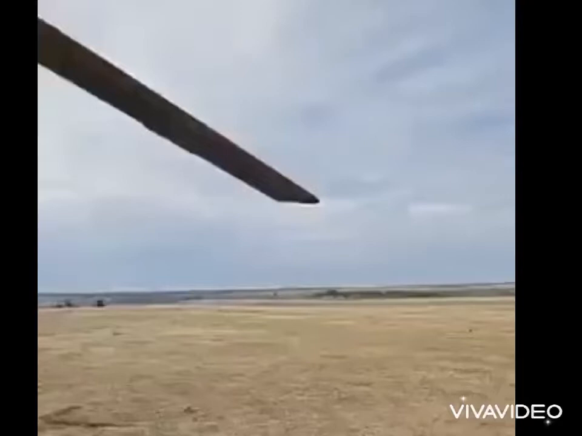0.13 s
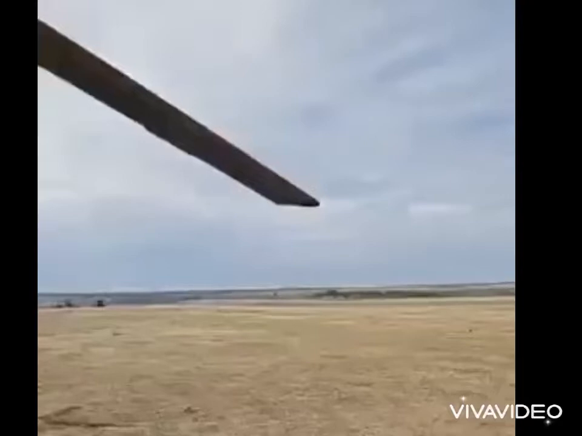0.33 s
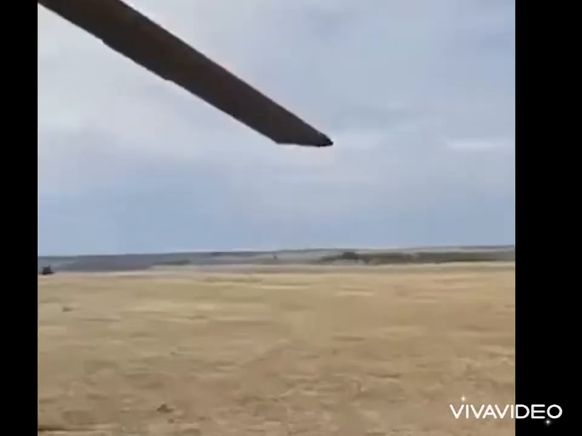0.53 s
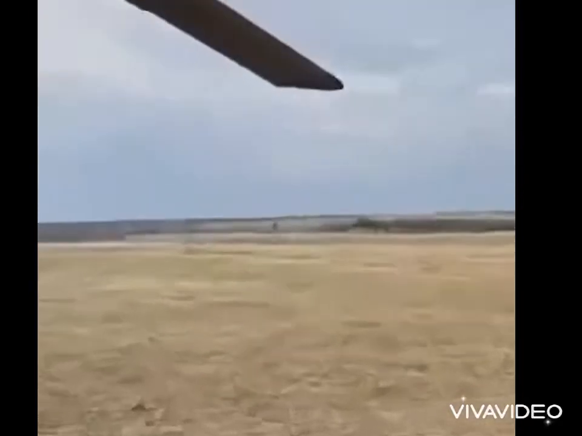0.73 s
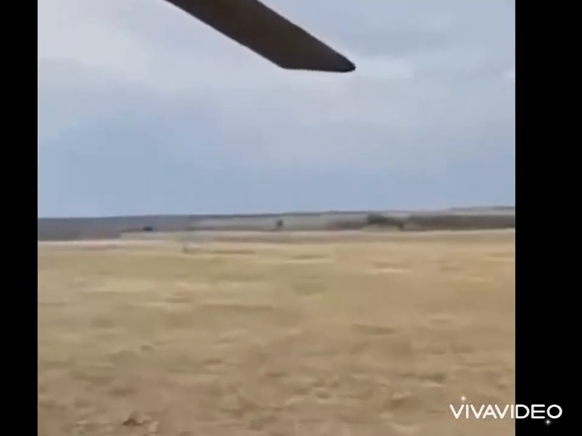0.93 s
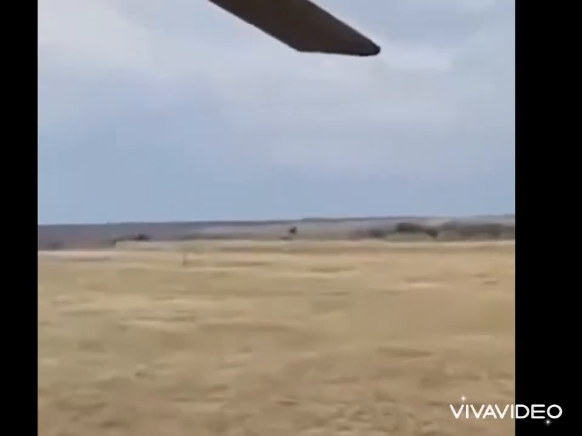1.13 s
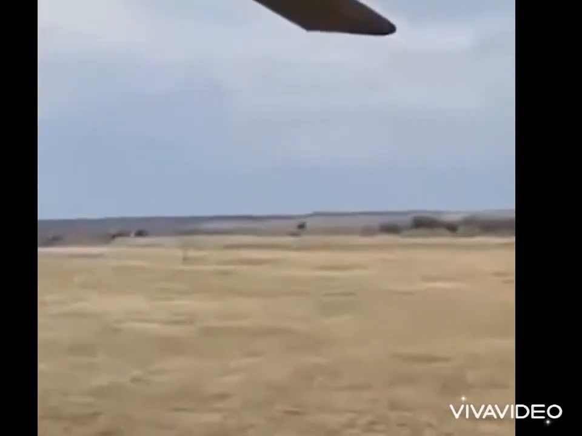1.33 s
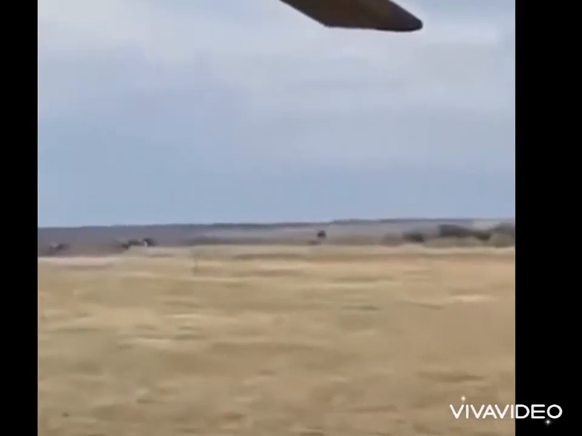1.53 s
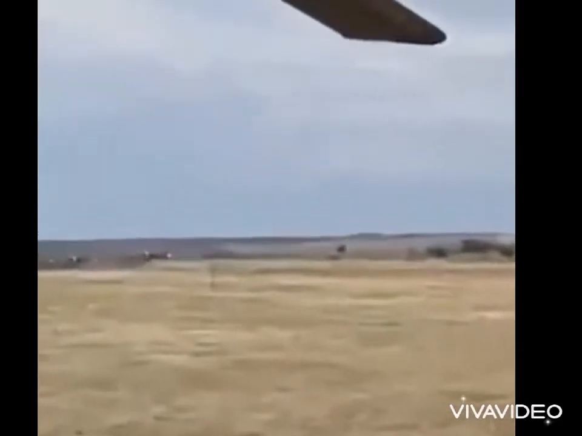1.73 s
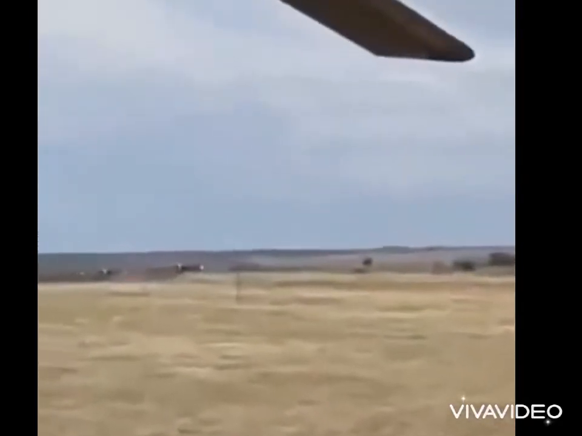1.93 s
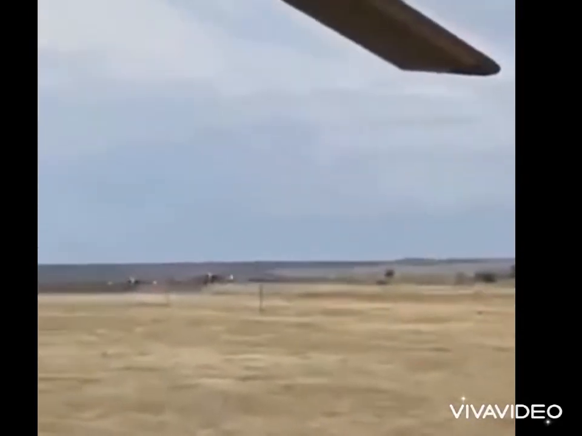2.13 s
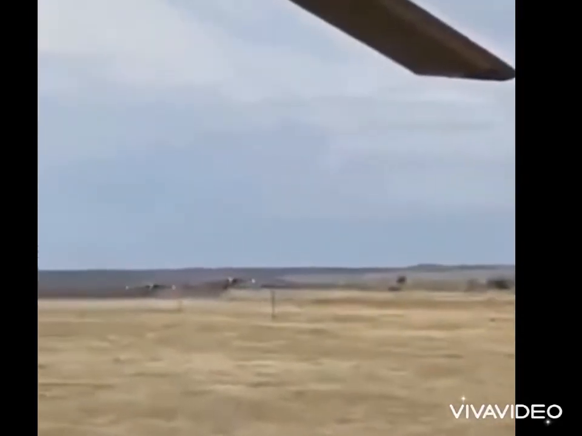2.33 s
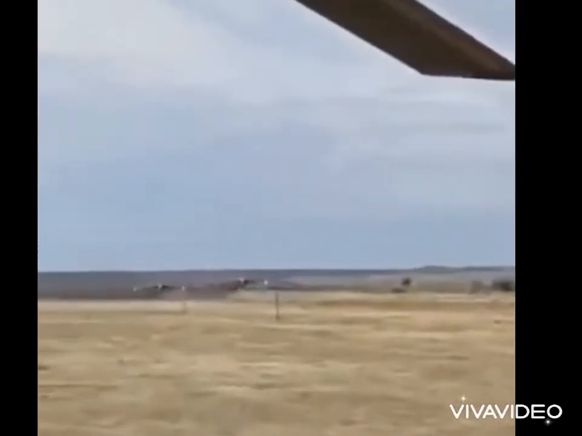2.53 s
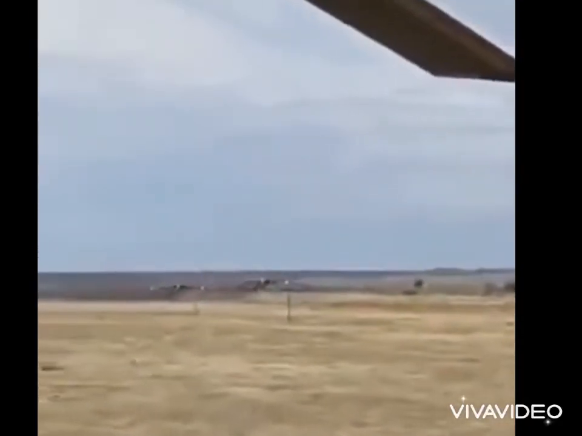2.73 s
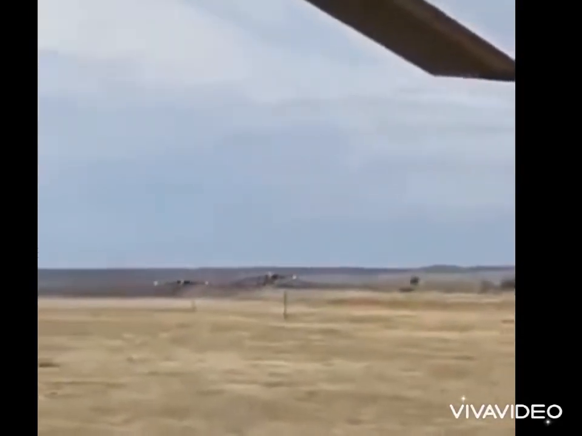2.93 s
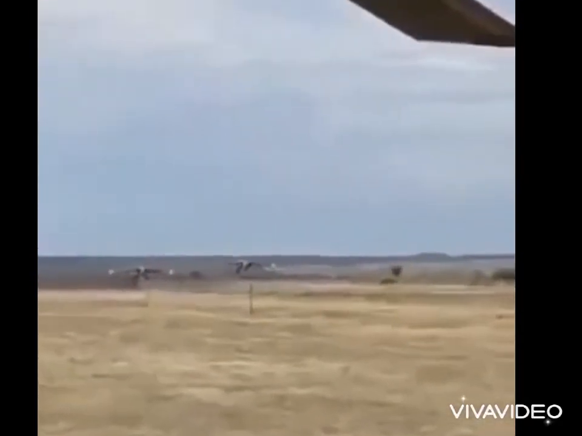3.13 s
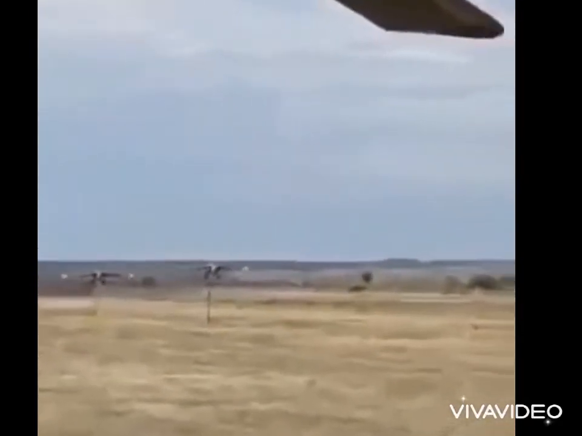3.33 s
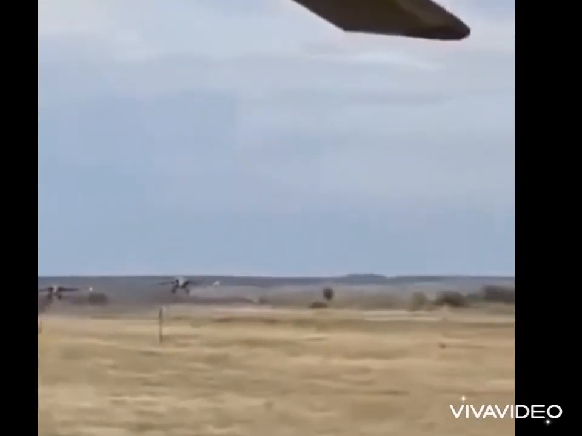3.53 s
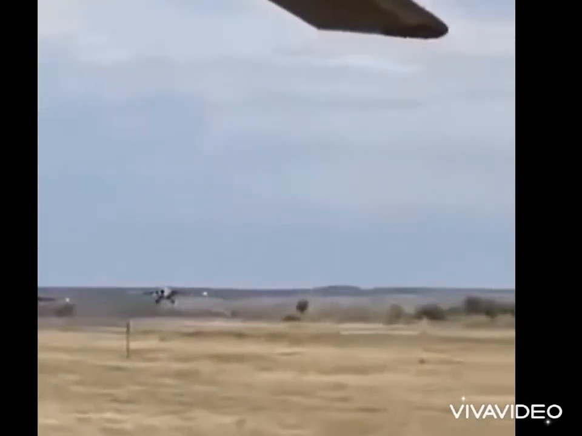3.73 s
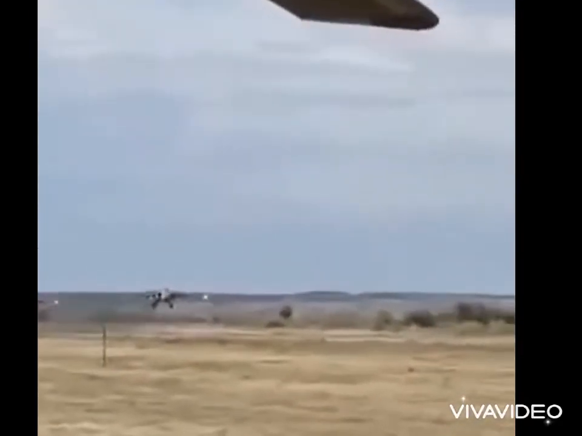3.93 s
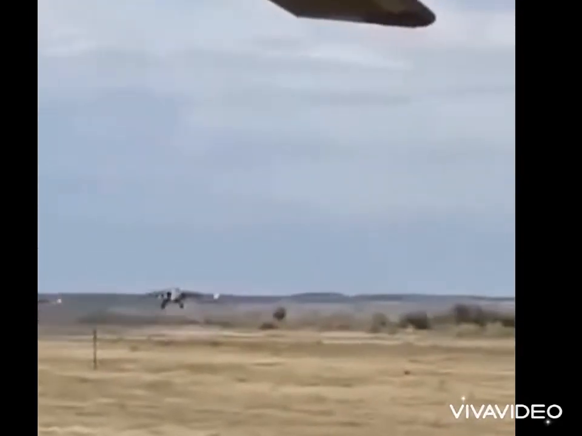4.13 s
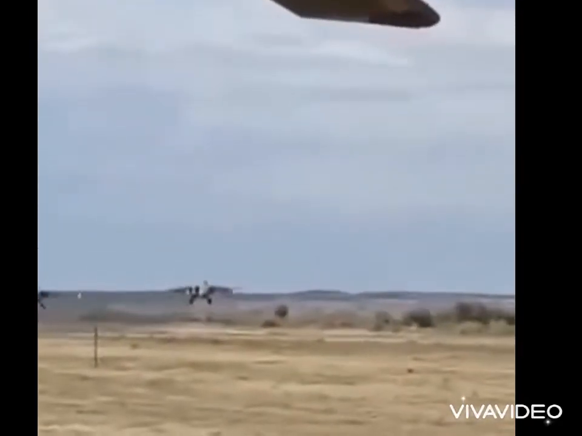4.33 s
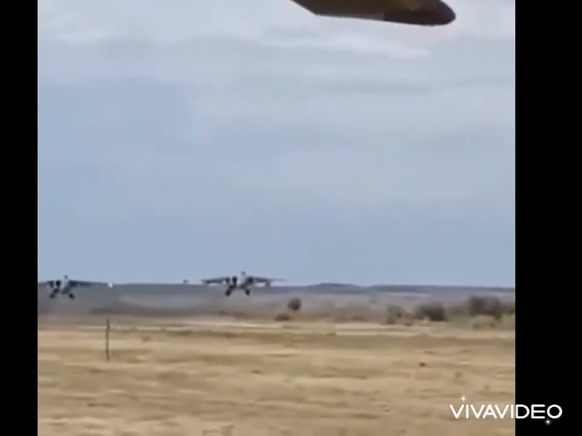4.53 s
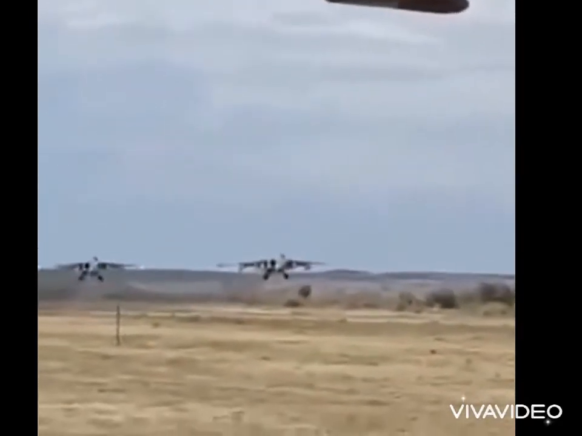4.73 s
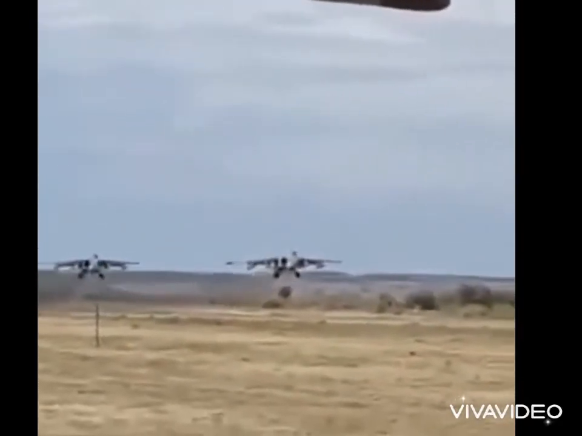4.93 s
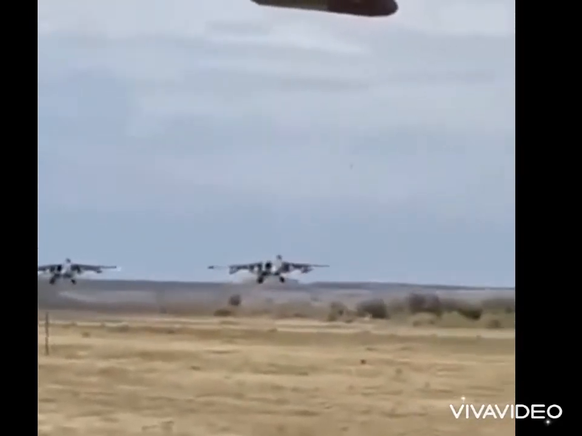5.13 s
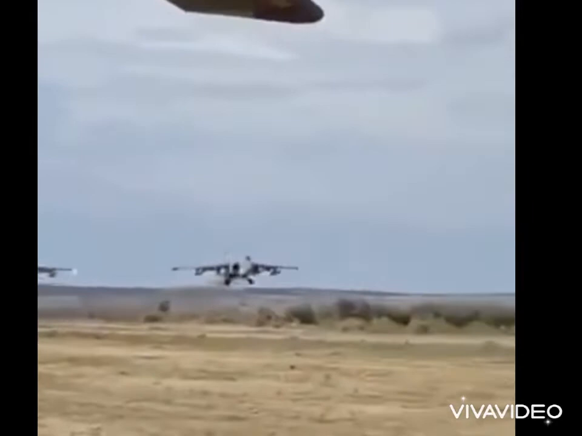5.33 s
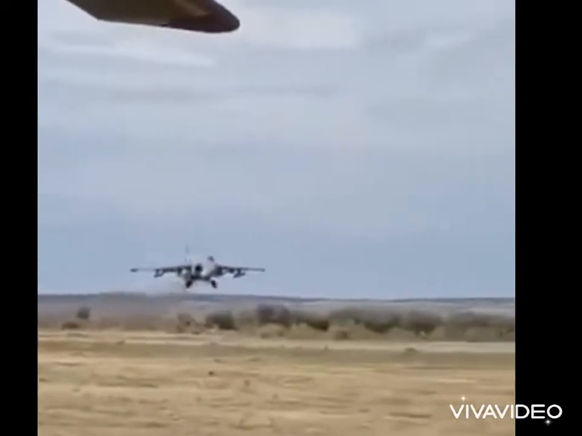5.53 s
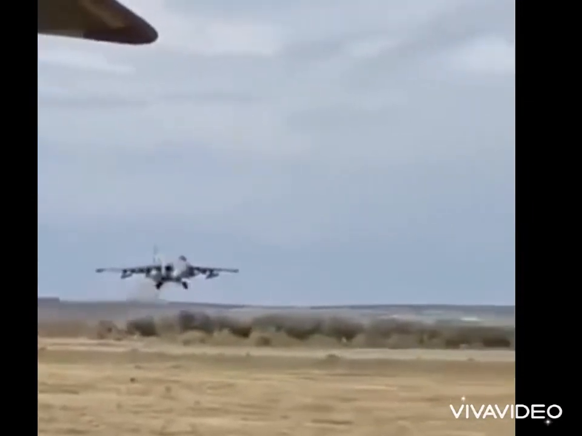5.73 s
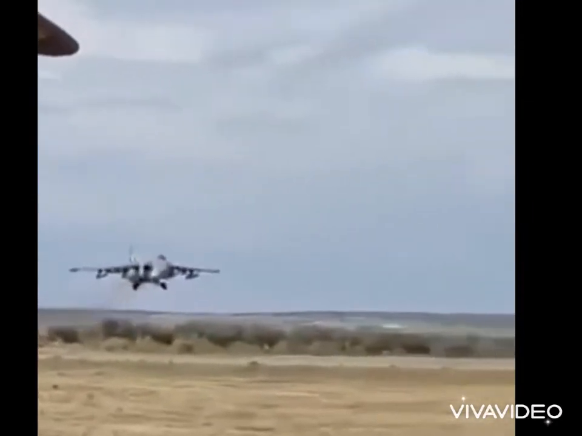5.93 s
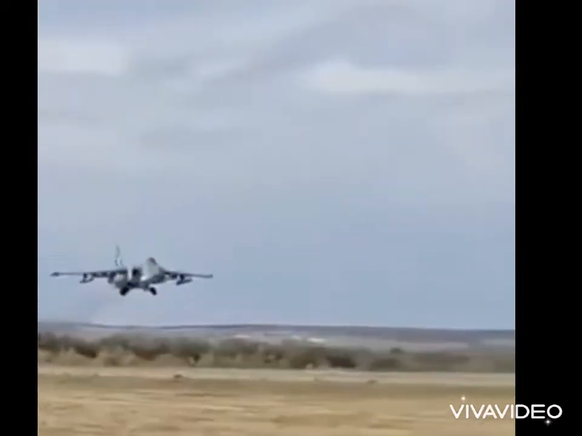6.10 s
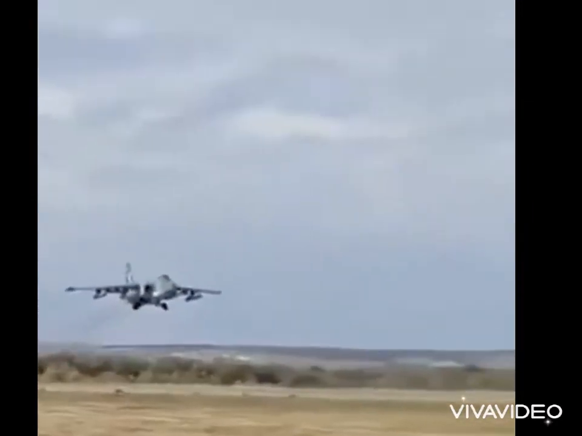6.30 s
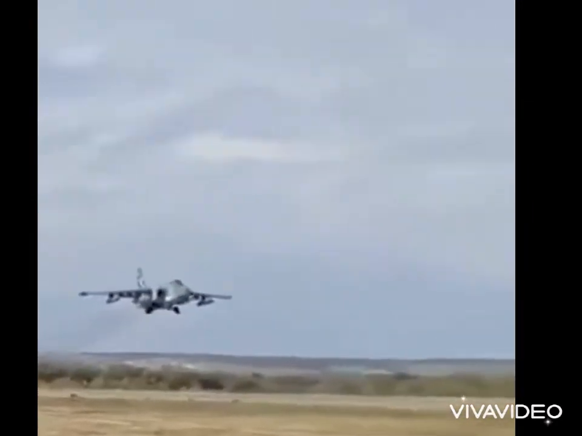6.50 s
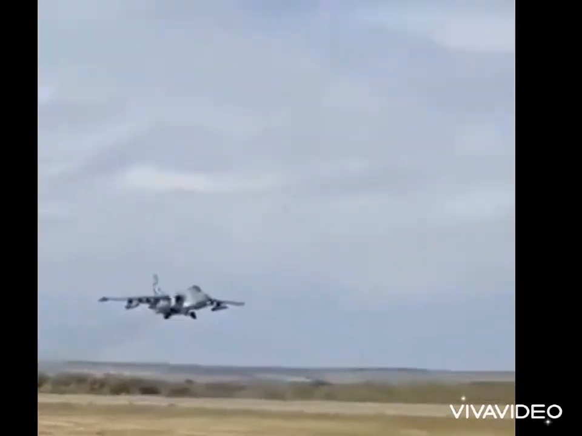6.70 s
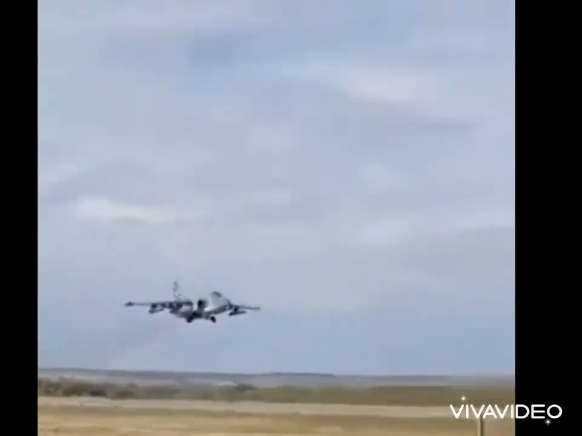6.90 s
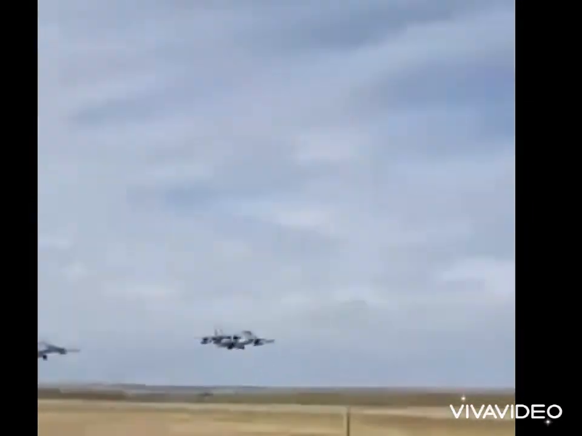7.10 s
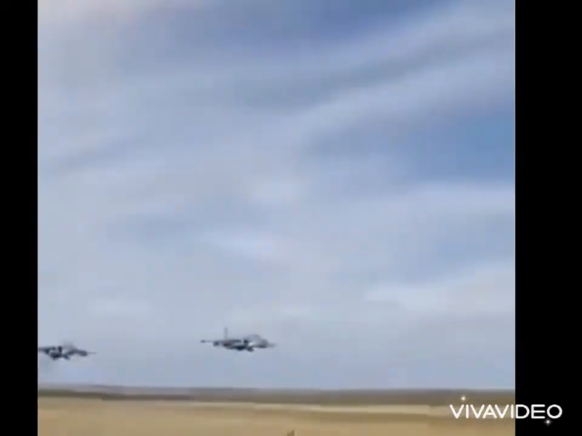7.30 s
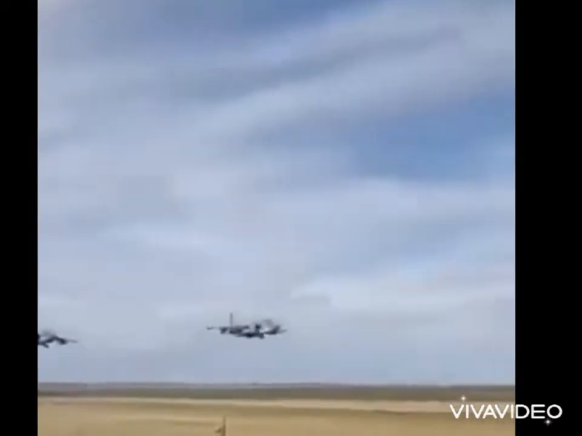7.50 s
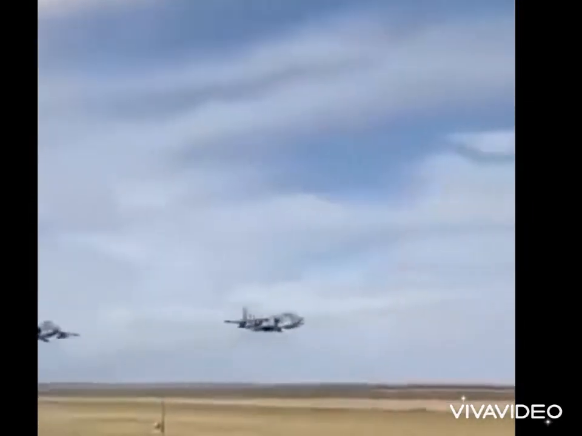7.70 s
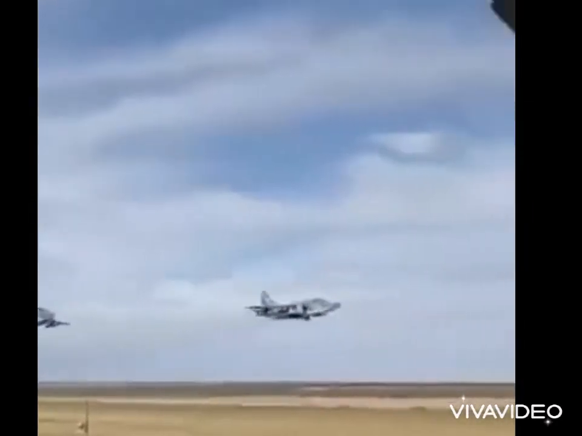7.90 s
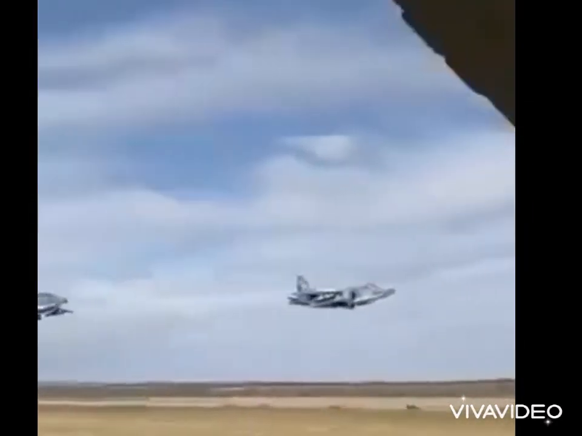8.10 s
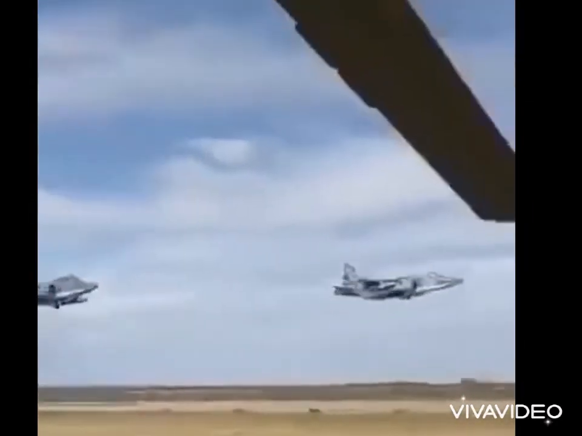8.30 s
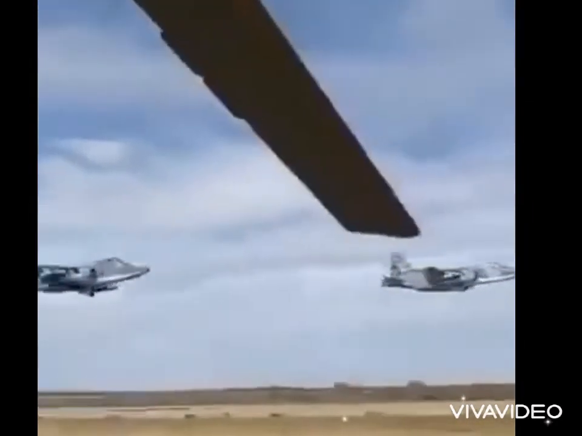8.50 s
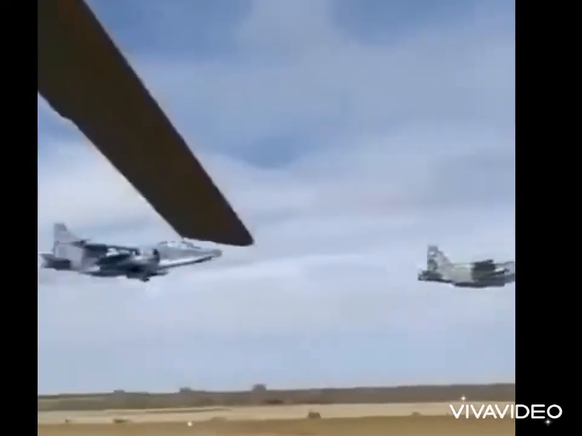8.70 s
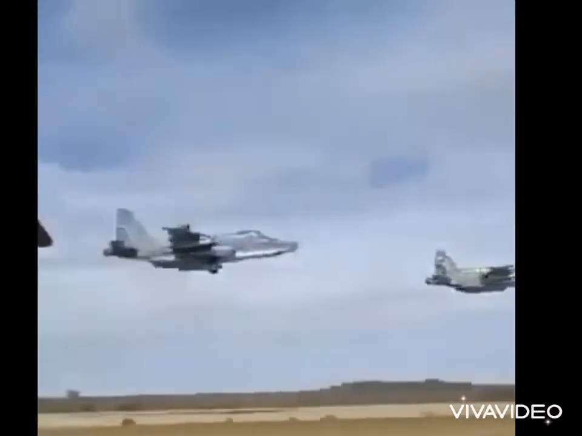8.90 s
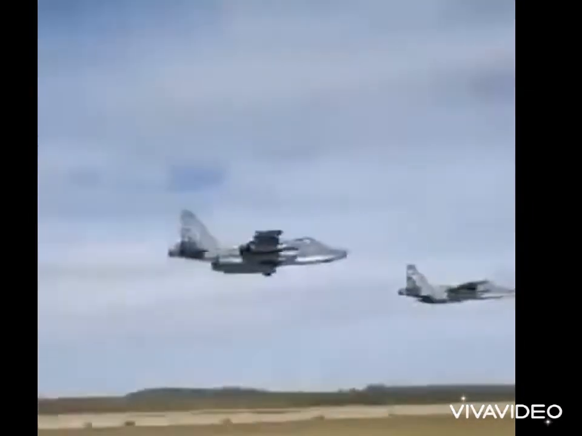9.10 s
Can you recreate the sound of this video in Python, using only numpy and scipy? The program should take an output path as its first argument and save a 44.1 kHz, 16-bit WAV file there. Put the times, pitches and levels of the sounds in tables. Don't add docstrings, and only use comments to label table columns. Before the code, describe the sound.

Gusty wind thumps and rasps on a phone microphone in an open field, then two low jets swell into a loud, overloading roar.

```python
import sys
import numpy as np
from scipy import signal
from scipy.fft import rfft, irfft, next_fast_len
from scipy.io import wavfile
from scipy.ndimage import uniform_filter1d, map_coordinates

SR = 44100
rng = np.random.default_rng(int(sys.argv[2]) if len(sys.argv) > 2 else 0)


def boost_factor(decibels):
    exponent = np.asarray(decibels, float) / 20
    return 10 ** exponent


def wav_record(signal):
    frames = np.transpose(np.atleast_2d(signal))
    bounded = np.clip(frames, -1, 1)
    quanta = np.round(bounded * 32767).astype(np.int16)
    wavfile.write(sys.argv[1], SR, quanta)


N = 403515

# frequency in Hz, level in dB per Hz.
RUMBLE_BAND = [(15, -52.5), (30, -16), (48, -15), (77, -1.5), (105, 1.5), (200, -0.5), (360, -5),
               (550, -16), (1000, -27.5), (3000, -89.5)]
# frequency in Hz, level in dB per Hz.
FLUTTER_BAND = [(150, -43.5), (350, -1), (550, 1), (900, -4), (1500, -15.5), (2500, -36), (5000, -61),
                (9000, -100)]
# frequency in Hz, level in dB per Hz.
RASP_BAND = [(500, -27.5), (1200, -1.5), (1700, -2.5), (2500, -9), (3500, -18.5), (5000, -28),
             (8000, -31.5), (10000, -57), (13000, -68.5)]
RASP_DB = -41


def unit(x):
    return x / np.sqrt(np.mean(x ** 2) + 1e-20)


def curves(rows):
    s, *cols = np.transpose(rows)
    return [np.interp(np.arange(N) / SR, s, c) for c in cols]


def wobble(rate):
    knots = rng.standard_normal(int(N * rate / SR) + 4)
    return map_coordinates(knots, [np.arange(N) * rate / SR])


def filtered(x, response):
    m = next_fast_len(N + 8192)
    return irfft(rfft(x, m) * response(np.fft.rfftfreq(m, 1 / SR)), m)[..., :N]


def coloured(x, spectrum):
    f, level = np.transpose(spectrum)
    return filtered(x, lambda hz: unit(boost_factor(np.interp(np.log(hz + 1), np.log(f), level))))


def noise(spectrum):
    return unit(coloured(rng.standard_normal(N), spectrum))


def spells(rows):
    t = np.arange(N) / SR
    half_s = 0.016 / 2
    total_db = np.zeros(N)
    for s, length, db in rows:
        end = s + length
        total_db += np.interp(t, [s - half_s, s + half_s, end - half_s, end + half_s], [0, db, db, 0])
    return total_db


def flow():
    # time in seconds, strength in dB, turbulence in dB.
    wind_course = [(0.62, -18.5, -6.5), (0.8, -15.5, -11), (1.35, -18.5, -6.5), (1.6, -13, 7),
                   (1.8, -19, -5), (2.3, -17.5, 0), (2.85, -18, -6), (3.3, -15.5, 6), (3.73, -13, -6.5),
                   (3.79, -18.5, -2), (4.4, -12, 12.5), (5.15, -14, 7.5), (5.9, -13.5, 12.5),
                   (6.3, -14.5, 6.5), (6.9, -11, 14.5), (8.1, -14, 15.5), (8.4, -23, 10.5),
                   (9.15, -15.5, 12)]
    # start in seconds, length in seconds, extra turbulence in dB.
    rough_gusts = [(.27, 0.043, 10), (.35, 0.027, 5), (.46, 0.034, 11), (.53, 0.077, 16.5),
                   (2.24, 0.086, 5), (1.09, 0.064, 12.5), (1.41, 0.057, 13.5), (1.5, 0.16, 9),
                   (1.78, 0.073, 9.5), (1.97, 0.062, 9), (2.62, 0.044, 12), (2.92, .11, 11.5),
                   (3.11, 0.13, 11), (3.31, 0.092, 13), (3.92, 0.082, 10.5), (4.07, .12, 6.5),
                   (4.33, 0.12, 5), (4.55, 0.16, 6.5), (4.77, .12, 1), (4.975, 0.07, 10.5), (5.2, 0.18, 2),
                   (5.42, 0.065, 13), (5.55, 0.036, 4.5), (5.69, .06, 0.5), (5.93, 0.069, 9),
                   (6.06, 0.057, 2.5), (6.22, 0.055, 6), (6.69, 0.098, 8.5), (6.82, 0.16, 4),
                   (7.0, 0.027, 3)]
    # start in seconds, length in seconds, depth in dB.
    quiet_lulls = [(.325, 0.021, 5), (.385, 0.085, 10), (.5, 0.021, 9), (.62, .14, 11.5), (1.02, 0.056, 6),
                   (1.36, 0.035, 7), (1.87, 0.027, 2.5), (2.035, 0.064, 10.5), (2.125, .11, 15),
                   (2.58, 0.02, 3.5), (2.7, 0.026, 3), (2.86, .05, 5), (3.04, 0.064, 1.5),
                   (3.51, 0.086, 11.5), (3.59, 0.087, 18), (3.99, 0.031, 8), (4.5, 0.042, 9.5),
                   (4.72, 0.024, 10.5), (4.93, 0.043, 6.5), (5.14, 0.057, 3), (5.51, 0.028, 0.5),
                   (5.76, 0.026, 6.5), (6.135, 0.077, 4), (6.66, 0.031, 15), (6.97, 0.028, 10),
                   (7.17, 0.044, 6), (7.37, .03, 6), (7.89, 0.019, 5), (8.09, 0.017, 7), (8.46, 0.027, 8)]
    strength_db, turbulence_db = curves(wind_course)
    gust_db, lull_db = spells(rough_gusts), spells(quiet_lulls)
    turbulence_db = turbulence_db + gust_db
    rumble_db = strength_db + 0.19 * gust_db - lull_db
    flutter_db = strength_db - 16 + 0.42 * turbulence_db - 0.9 * lull_db
    rasp_db = strength_db + RASP_DB + 1.094 * turbulence_db - 0.6 * lull_db
    return rumble_db, flutter_db, rasp_db


def wind():
    rumble_db, flutter_db, rasp_db = flow()
    eddies = unit(0.35 * wobble(25) + wobble(70))
    steps = unit(boost_factor(2.74 * wobble(220)) * rng.standard_normal(N))
    rumble = unit(boost_factor(3.0 * eddies) * noise(RUMBLE_BAND))
    flutter = unit(boost_factor(2.7 * eddies) * coloured(steps, FLUTTER_BAND))
    rasp = unit(boost_factor(3.2 * eddies) * coloured(steps, RASP_BAND))
    return boost_factor(rumble_db) * rumble + boost_factor(flutter_db) * flutter + boost_factor(rasp_db) * rasp


def small_puffs():
    per_second = 13
    rumble_db, _, rasp_db = flow()
    luck = rng.standard_normal((150, 4))
    s = np.cumsum(np.exp(.6 * luck[:, 0]) / per_second)
    at = np.minimum(s * SR, N - 1).astype(int)
    rough_db = rasp_db[at] - rumble_db[at] - RASP_DB
    peak_db = rumble_db[at] - 3 + 4 * luck[:, 1]
    thud_db = 3.5 + 4 * luck[:, 2]
    crackle_db = -28.5 + 0.66 * rough_db + 4 * luck[:, 3]
    rows = np.transpose([s, peak_db, thud_db, crackle_db])
    return [row for row in rows if row[0] < N / SR]


def puffs():
    # time in seconds, peak in dB, thud in dB over the peak, rasp in dB over the peak.
    strong_eddies = [(0.272, -15, 2.5, -16), (0.36, -13.5, -8.5, -32), (0.464, -14, 6, -23.5),
                     (0.548, -6.5, -12, -17), (0.598, -15.5, -6.5, -11), (1.125, -11.5, -7, -26),
                     (1.437, -8, -5.5, -25), (1.514, -11, 1.5, -17), (1.841, -16, 10, -14.5),
                     (2.11, -19.5, 6.5, -37), (3.722, -20, 13, -35), (2.94, -10, 8.5, -15.5),
                     (3.114, -12.5, 1, -16.5), (3.209, -12.5, 5, -11.5), (3.325, -8.5, 1.5, -16),
                     (4.156, -19, 2.5, 0), (4.197, -10, 6, -32), (4.56, -14, -0.5, -19.5),
                     (4.651, -5, -3.5, -13.5), (4.98, -8, 4, -11.5), (5.436, -6, -2, -7.5),
                     (5.878, -6.5, -3, -20.5), (5.953, -3, 2.5, -13.5), (6.077, -6, -7.5, -18.5),
                     (6.119, -7.5, -5, -17.5), (6.693, -7, -2, -17), (6.756, -6.5, -8.5, -20.5),
                     (6.847, -10, -3, -7.5), (5.743, -12, -2, -18), (7.007, -2.5, -1, -15.5)]
    t = np.arange(SR // 10) / SR
    snap = 0.9 * np.exp(-((t - .003) / 0.0014) ** 2)
    fall_60db_s = np.array([[.07], [.04], [.025]])
    tail = (1 - np.exp(-t / 0.0026)) * boost_factor(-60 * t / fall_60db_s)
    pushes = np.zeros((3, N + len(t)))
    for s, db, thud_db, rasp_db in strong_eddies + small_puffs():
        levels = boost_factor(db + np.array([[thud_db - 3], [-8], [rasp_db - 2]]))
        burst = levels * (snap + tail) * rng.standard_normal(len(t))
        pushes[:, round(s * SR):][:, :len(t)] += burst
    bands = (RUMBLE_BAND, FLUTTER_BAND, RASP_BAND)
    return sum(coloured(push[:N], band) for push, band in zip(pushes, bands))


def field():
    # frequency in Hz, level in dB per Hz.
    far_spectrum = [(200, -39), (600, 3.5), (1500, -8), (3000, -25), (5000, -33.5), (8300, -33.5),
                    (9000, -59.5), (13000, -80.5)]
    return boost_factor(-51 + 1.5 * wobble(3.8)) * noise(far_spectrum)


def jets():
    # time in seconds, nearness in dB, ground hump in dB over the roar.
    approach = [
        (7.05, -30, 12.5),
        (7.45, -32.5, 11.5),
        (7.65, -22.5, 9.5),
        (8.05, -17.5, 4),
        (8.12, -16.5, 11.5),
        (8.24, -8.5, 3.5),
        (8.8, -9, 4),
        (8.88, -9, -3),
        (9.15, -8.5, -10),
    ]
    # start in seconds, length in seconds, level in dB.
    carried_gusts = [
        (7.7, .07, 7.5),
        (8.21, .06, 2),
    ]
    # frequency in Hz, level in dB per Hz.
    roar_spectrum = [(60, -39.5), (200, -7), (380, -2), (520, -4), (700, 0), (1200, 1), (1950, -5.5),
                     (2900, -7.5), (4500, -19.5), (8000, -50.5)]
    # frequency in Hz, level in dB per Hz.
    hiss_spectrum = [(1500, -31), (3500, 3.5), (4500, 0), (6500, -1.5), (8000, -11.5), (9500, -28.5),
                     (12800, -26.5), (16000, -42)]
    t = np.arange(N) / SR
    since = t - approach[0][0]
    audible = np.clip(since / 0.35, 0, 1)
    roar_db, hump_db = curves(approach)
    roar_db = roar_db + uniform_filter1d(spells(carried_gusts), size=1500)
    hiss_db = -21 + 1.073 * roar_db + 7.5 * since

    hump_hz = 690 + np.interp(t, [7.55, 7.9], [0, 85]) + 20 * wobble(12)
    turn = 2 * np.pi * np.cumsum(hump_hz) / SR
    sway = [unit(filtered(rng.standard_normal(N), lambda hz: np.exp(-(hz / 250) ** 2))) for _ in range(2)]
    hump = sway[0] * np.cos(turn) + sway[1] * np.sin(turn)
    hump = filtered(hump, lambda hz: 1 / (1 + (560 / (hz + 1)) ** 14))

    air = wobble(14)
    roar = boost_factor(roar_db + 2.5 + 1.2 * air) * noise(roar_spectrum)
    hiss = boost_factor(hiss_db + 0.82 * air) * noise(hiss_spectrum)
    hump = boost_factor(roar_db + hump_db - 1.0 + 0.65 * air + 1.1 * wobble(10)) * hump
    return audible * (hump + roar + hiss)


def scene():
    return np.tile(wind() + puffs() + field() + jets(), (2, 1))


def thin_treble(x):
    # from in Hz, to in Hz, weakest line kept in dB against the middle register.
    thinned_bands = [(1500, 2500, -33), (2500, 3600, -39), (3600, 4300, -35), (4300, 5200, -40),
                     (5200, 6100, -42), (6100, 6950, -45), (6950, 7700, -39), (7700, 8700, -42),
                     (8700, 9800, -45), (9800, 11200, -50), (11200, 13000, -54)]
    hz, _, z = signal.stft(x, SR, nperseg=2048)
    line_db = 20 * np.log10(np.abs(z[0]) + 1e-10)
    middle = z[0, (hz > 600) & (hz < 3000)]
    middle_db = 20 * np.log10(np.sqrt(np.mean(np.abs(middle) ** 2, 0)) + 1e-10)
    frames = len(middle_db)
    strict_db = 5 * uniform_filter1d(rng.standard_normal(frames), size=3)
    strict_db += np.clip(middle_db - np.median(middle_db), 0, 14) / 2
    for lo_hz, hi_hz, least_db in thinned_bands:
        band = (hz >= lo_hz) & (hz < hi_hz)
        floor_db = middle_db + least_db + strict_db + 2.5 * rng.standard_normal(frames)
        z[:, band] *= np.clip(line_db[band] - floor_db, 0, 1)
    shape = z.shape[1:]
    z *= 1 + .16 * (rng.standard_normal(shape) + 1j * rng.standard_normal(shape))
    return signal.istft(z, SR, nperseg=2048)[1][:, :N]


def top_cut(x):
    return signal.sosfilt(signal.butter(12, 12940, fs=SR, output="sos"), x)


def record(dry):
    # from in seconds, to in seconds.
    silences = [
        (0, .2715),
        (2.154, 2.2252),
    ]
    return_jumps = [.14, .05]
    x = dry / (1 + np.abs(dry / 0.65) ** 6) ** (1 / 6)
    x = filtered(x, lambda hz: 1j * hz / (70 + 1j * hz))
    x = thin_treble(x)
    x += boost_factor(-79.5) * noise([(2000, -20.0), (4000, -2), (8400, -1.5), (8800, -39.5)])
    settle = np.exp(-np.arange(SR // 50) / SR / .002)
    for (start, end), jump in zip(silences, return_jumps):
        x[:, round(start * SR):round(end * SR)] = 0
        x[:, round(end * SR):][:, :len(settle)] -= jump * settle
    x = filtered(x, lambda hz: hz < 13000)
    return top_cut(np.clip(1.05 * x, -1, 1))


dry = scene()
out = record(dry)
wav_record(out)
```